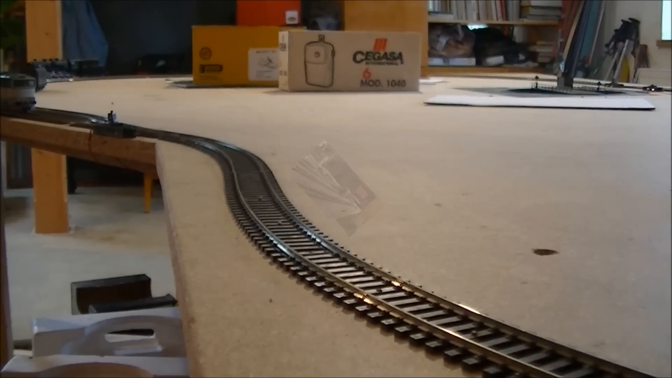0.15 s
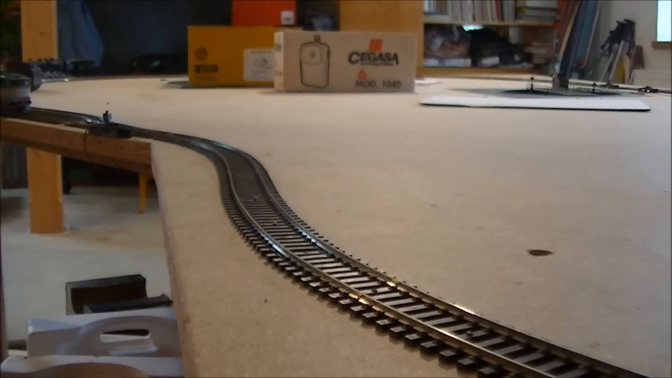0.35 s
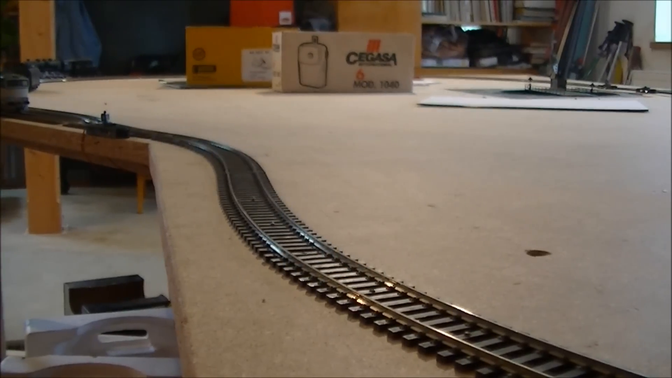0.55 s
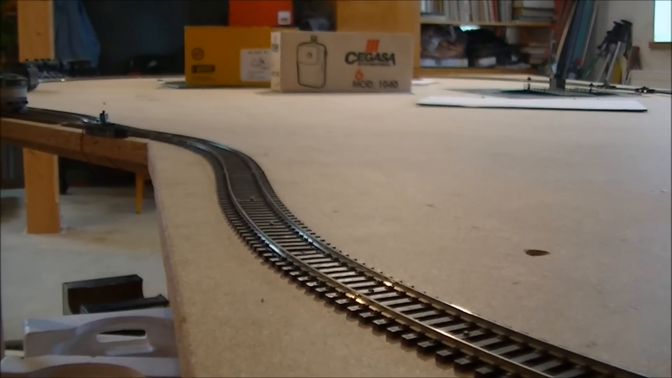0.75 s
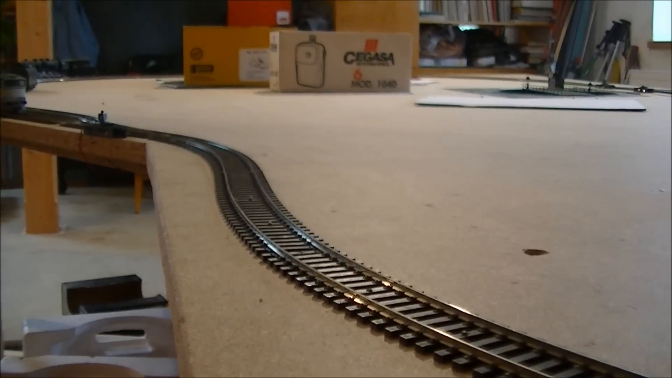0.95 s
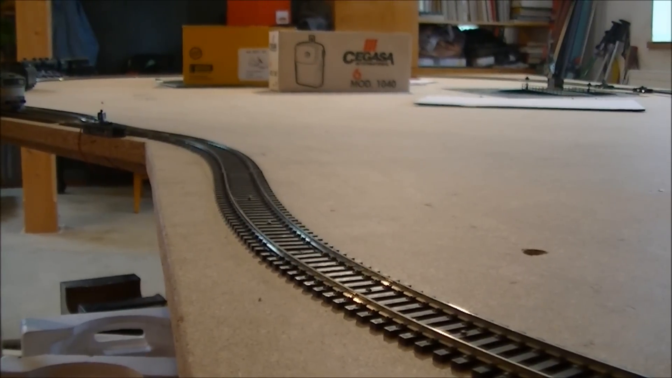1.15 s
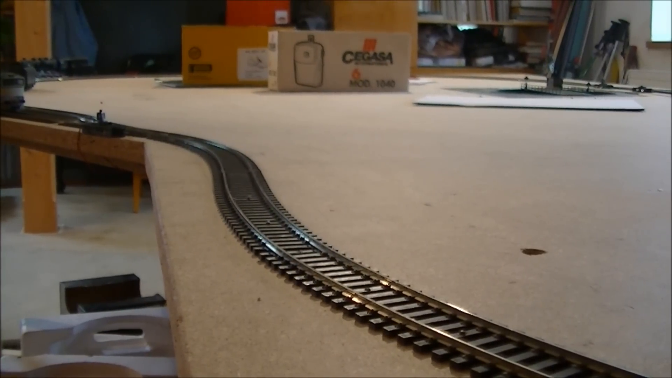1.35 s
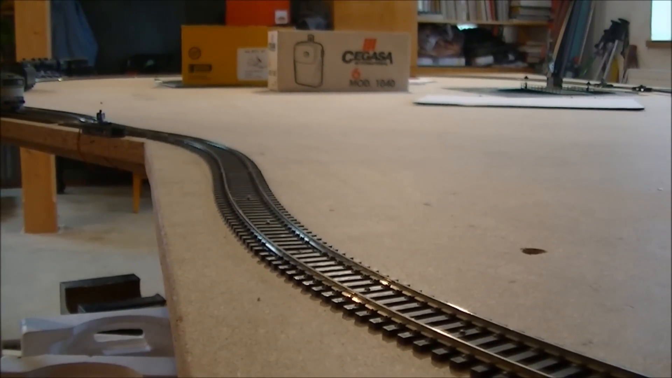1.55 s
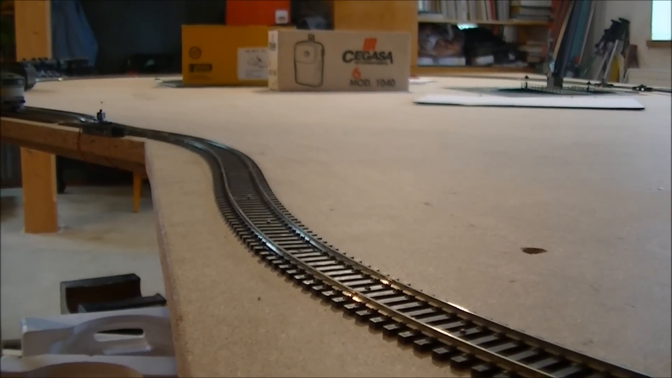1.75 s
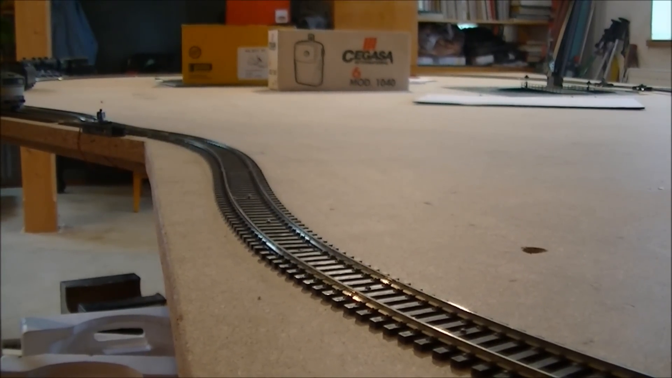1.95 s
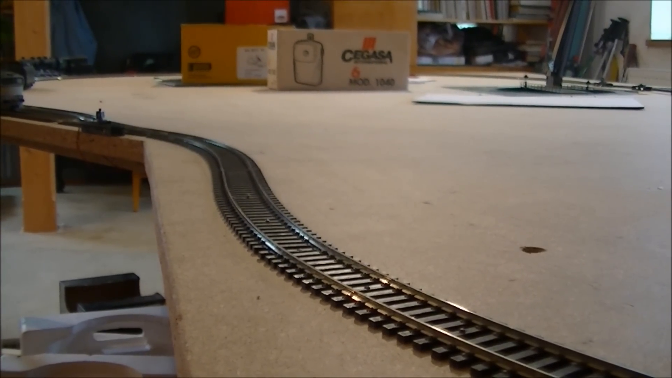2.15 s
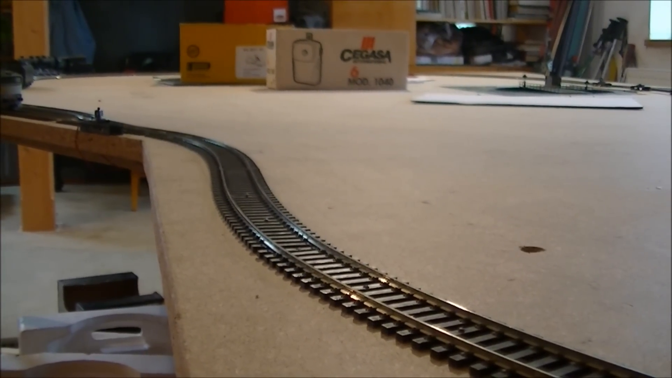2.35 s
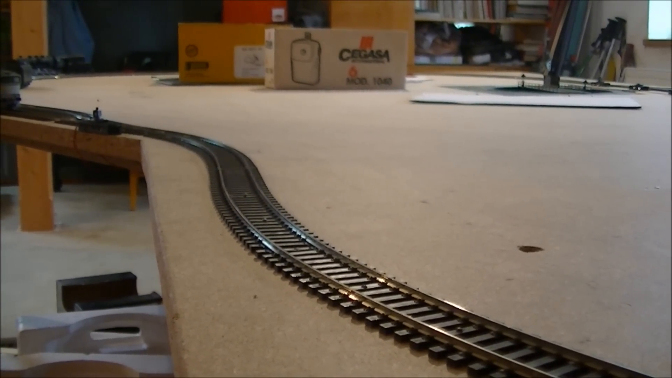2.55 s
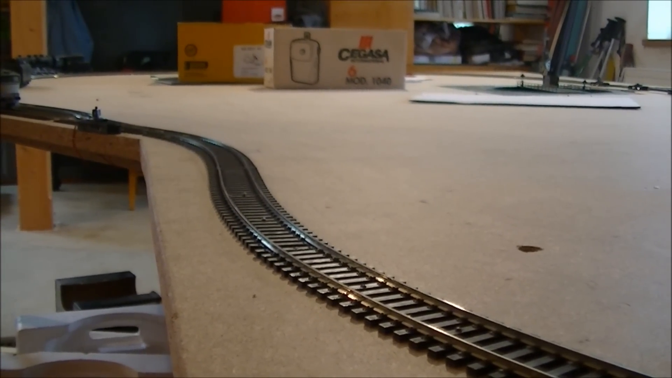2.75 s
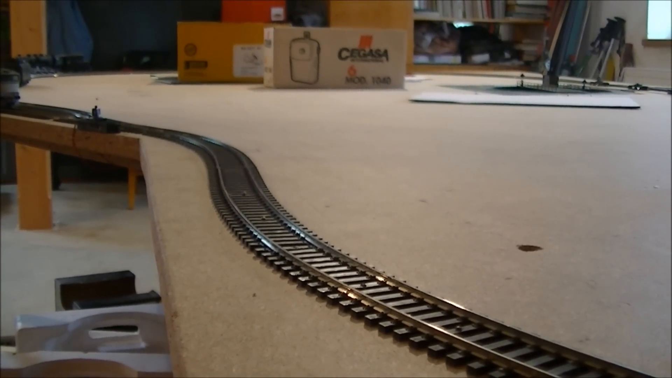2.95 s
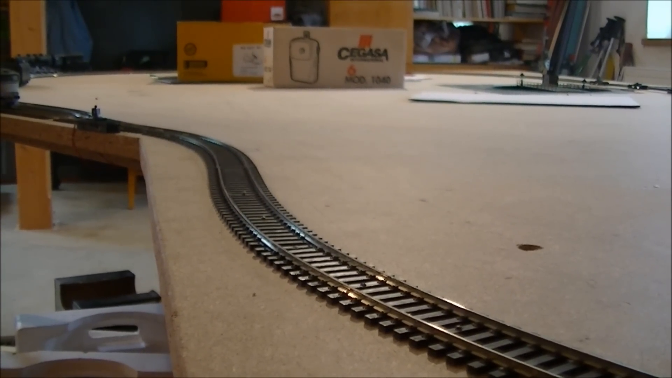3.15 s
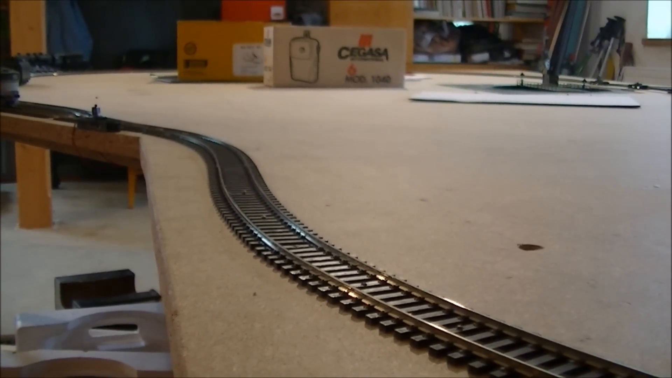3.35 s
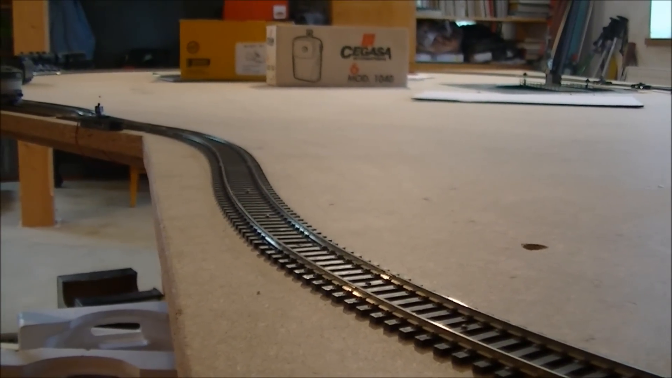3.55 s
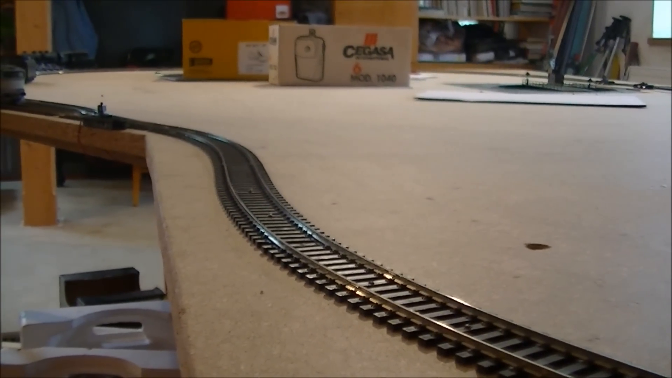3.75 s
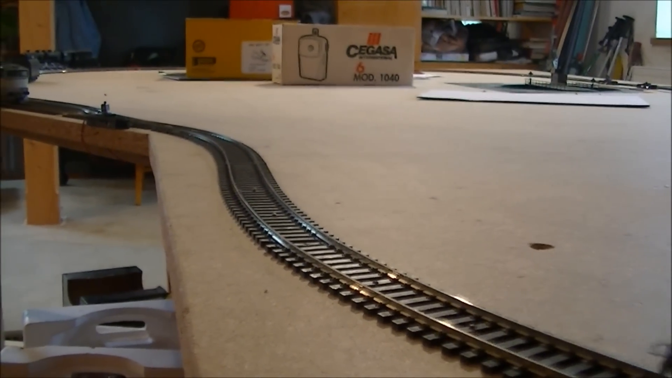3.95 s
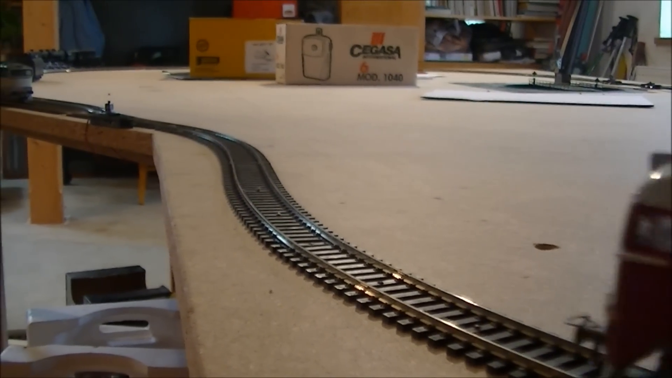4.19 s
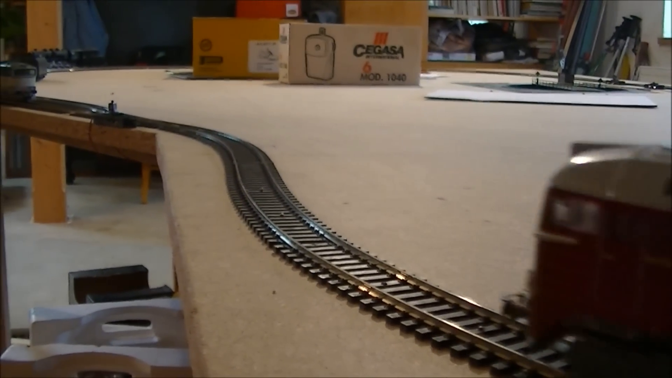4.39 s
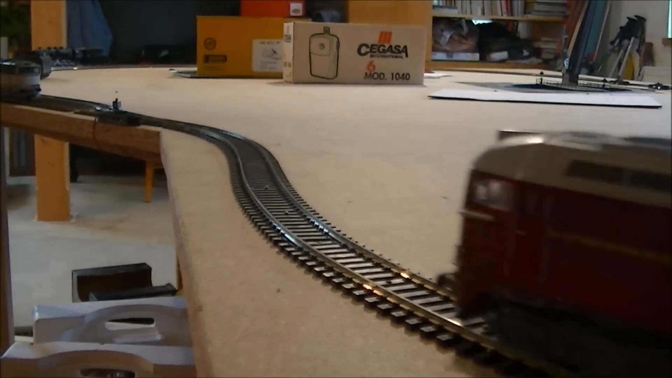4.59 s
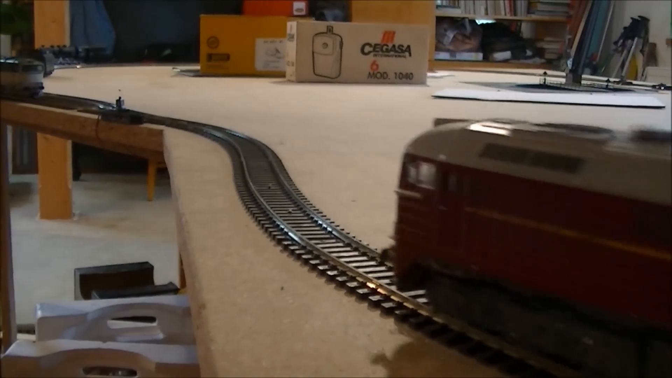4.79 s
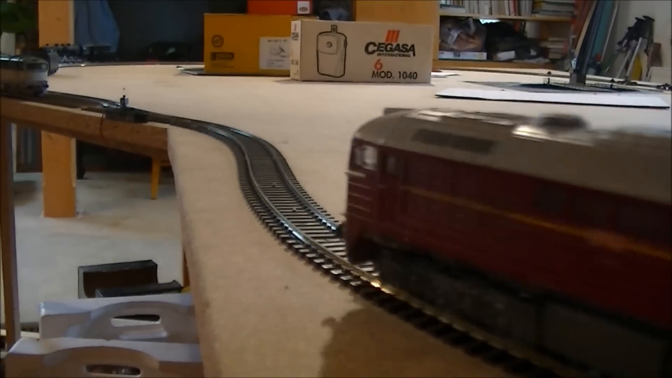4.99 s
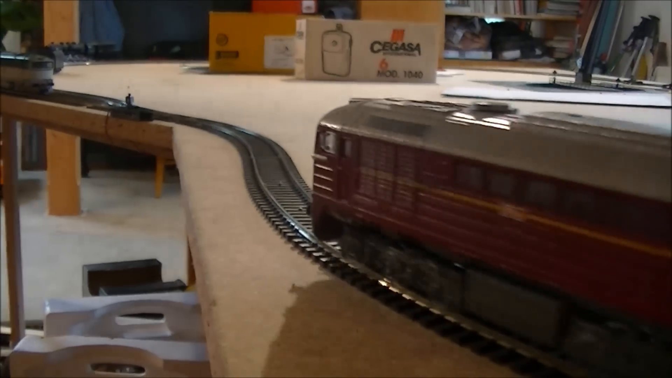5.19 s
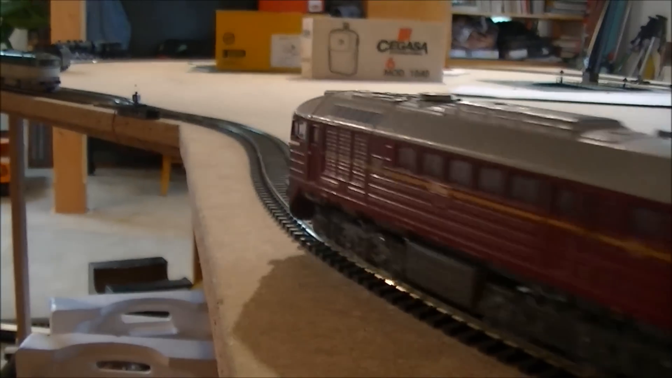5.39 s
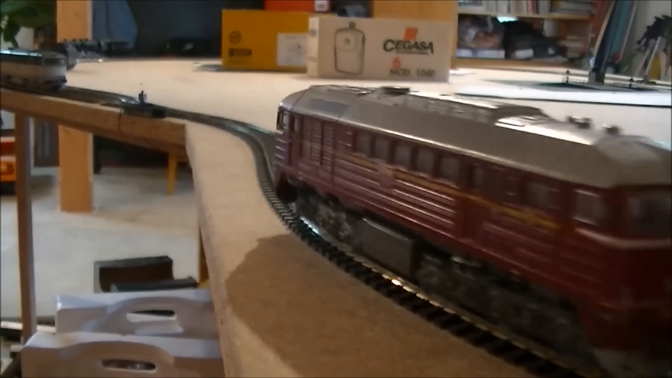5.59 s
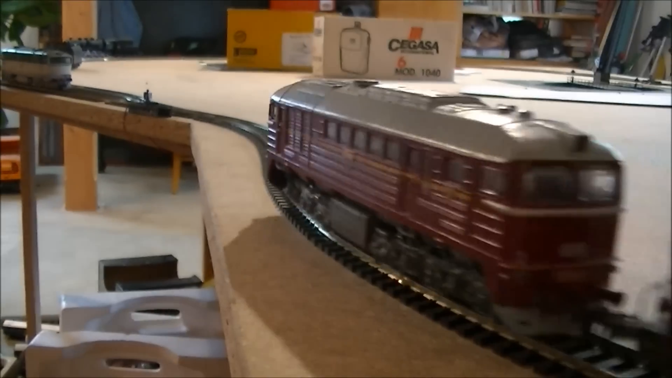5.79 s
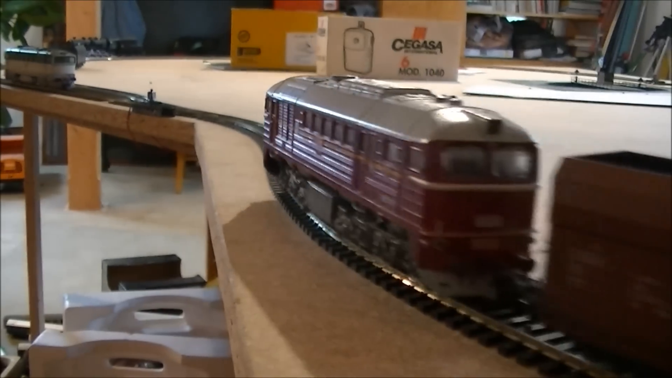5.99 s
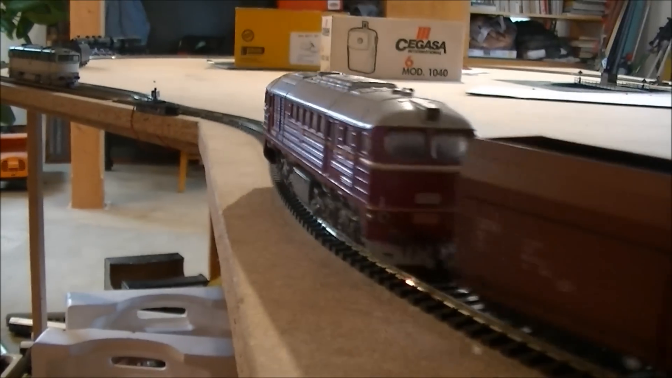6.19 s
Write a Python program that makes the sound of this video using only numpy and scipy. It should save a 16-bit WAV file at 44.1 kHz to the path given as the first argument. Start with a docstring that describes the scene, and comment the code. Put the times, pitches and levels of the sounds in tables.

```python
"""The gear train of a small electric model locomotive chatters as it passes close by on a chipboard layout.
Each contact of its 13-tooth pinion is an impact that excites the resonances of gearbox and shell; one
worn tooth knocks once a turn, and the motor sags where the current drops out. Metal wheels rush on the
rails, rail joints and a few harder gear knocks give sharp clicks and thuds, and a nick in one wheel
rings its rim. The board rumbles underneath, and a furnished room adds a short reverberation."""
import sys
import numpy as np
from scipy import signal
from scipy.fft import rfft, irfft, next_fast_len
from scipy.io import wavfile
from scipy.ndimage import uniform_filter1d

SR = 44100
rng = np.random.default_rng(int(sys.argv[2]) if len(sys.argv) > 2 else 0)


def transcribe(u):
    """Save the signal u as a 16-bit wav file named by the first command-line argument.

    u: samples, shape (n,) or (channels, n), limited to [-1, 1]; the rate is SR.
    q: integer samples, one column per channel.
    """
    v = np.clip(np.atleast_2d(u).T, -1, 1)
    q = np.round(v * 32767).astype(np.int16)
    wavfile.write(sys.argv[1], SR, q)


N = 274743
CLOCK = np.arange(0, N / SR + .004, .004)  # t/s for slowly varying gains

# reverberation time of the room: f/Hz, T60/s
ROOM_DECAY = [(300, 1), (2000, 0.36), (10000, 0.084)]
# relative spectrum of wheels rolling on rails: f/Hz, level/dB
RUSH_SPECTRUM = [(35, -64), (60, -59), (278, -23), (420, -15), (642, -6.5), (953, -8), (2100, -1.5),
                 (2800, -7), (3580, -4), (4520, -8), (5580, -6.5), (6300, -15.5), (7500, -13), (9300, -17),
                 (13800, -63), (15500, -67)]
# relative spectrum of the wagon wheels: f/Hz, level/dB
FIZZ_SPECTRUM = [(6180, -44), (10500, -14), (12500, -6), (13200, -9), (15800, -14.5)]
# sharp clicks and thuds from the running train (rail joints and a few harder gear knocks),
# in relative levels: t/s, click/dB, thud/dB, treble/dB
SHARP_IMPACTS = [(.388, -34, -34, -55), (1.5603, -45, -31, -45), (3.312, -36, -33, -44),
                 (3.5605, -24, -35, -42), (3.578, -43, -29, -46), (3.6755, -30, -25, -45),
                 (3.7985, -27, -27, -38), (3.8466, -24.5, -27.5, -51), (3.879, -30, -30, -32),
                 (3.911, -15.5, -28, -27), (4.447, -31, -29, -24), (4.663, -25, -36, -39),
                 (4.687, -26, -40, -31), (5.009, -31, -35, -18.5), (5.3768, -35, -30, -27),
                 (5.466, -39, -26, -23), (5.8114, -24.5, -24.5, -27), (5.898, -41, -31, -21),
                 (6.1116, -35, -31, -41)]
# resonances they excite, one list each for thud, click and treble: f/Hz, bandwidth/Hz, gain/dB
IMPACT_MODES = [(1380, 450, 10), (2184, 63, 15.5)], [(3300, 470, 15.5), (4500, 3200, -3)], [(8100, 2700, 3),
                (12500, 3000, -32.5)]
# audible blows of a nick in a driven wheel, in runs about three pinion turns apart: t/s, relative level/dB
NICK_BLOWS = [(0.8275, -32), (1.0236, -37), (1.0884, -31), (1.1588, -33), (2.726, -34), (2.7914, -26),
              (2.8574, -30), (2.924, -36), (2.9891, -33), (3.0976, -20), (3.1617, -27), (3.2246, -30),
              (3.2899, -26), (3.4379, -26.5), (3.5867, -32), (4.8424, -25), (4.917, -24), (4.9866, -25),
              (5.1054, -30), (5.239, -27), (5.3083, -28), (5.3762, -31), (5.443, -33), (5.5095, -31),
              (5.6181, -30), (5.684, -33)]
# pinion speed apart from drop-outs: t/s, speed/(turns/s)
PINION_SPEED = [(0, 46.19), (.14, 44.99), (.76, 50.47), (.88, 46.08), (1.35, 43.96), (1.56, 47.05),
                (1.86, 49.47), (2.26, 43.72), (2.5, 42.01), (2.64, 41.44), (2.8, 47.14), (2.85, 45.3),
                (3.29, 47.35), (3.5, 40.8), (3.96, 32), (3.99, 33.18), (4.24, 34.76), (4.56, 36.49),
                (4.8, 39.63), (5.09, 43.3), (5.66, 45.93), (6.08, 48.83), (6.3, 45.95)]
# breaks in the current: t/s, depth/dB, duration/s, rotation lost/turns
CURRENT_DROPOUTS = [(1.134, 3, .027, .129), (3.361, 4, .04, .668), (3.63, 2.5, .037, .902),
                    (3.853, 9.5, .026, .79), (3.9, 3.5, .03, .533), (4.191, 4, .02, .794)]
# relative strength of the teeth in order of meshing: hiss/dB, knock/dB, drone/dB
TOOTH_LEVELS = [(4.5, -3, 1.5), (3.5, 2.5, 0), (-1, -6, 5), (-15, -14.5, -4.5), (-3.5, -6, -8),
                (1, -9, -2.5), (-5, -12.5, -3), (1.5, -9.5, -2.5), (-1.5, -9.5, -11), (-4, -6.5, -5.5),
                (2, -10, 3.5), (-2, -7.5, -2.5), (-0.5, -5.5, -4)]
# play in the gears, which makes the teeth more unlike: t/s, factor on the tooth levels in dB
BACKLASH = [(0, 1.1), (1.1, 1), (1.18, 1.45), (1.5, 1.3), (1.8, .8), (2.15, 1.1), (2.4, 1.6), (2.55, 1.3),
            (3, 1), (3.1, 1.1), (3.55, 1.25), (4.5, 1.5), (4.62, 1), (4.7, 1.16), (5.05, 1.3), (5.25, 1.1),
            (6.23, 1)]
# low resonances of shell and gearbox, whose lobes and shadows sweep over the listener:
# f/Hz, bandwidth/Hz, gain/dB, [(lobe gain/dB, t/s, width/s)]
DRONE_MODES = [(833, 62, -9, [(16, 4.51, 0.24), (-6.5, 4.57, .3)]), (910, 140, -11, [(18, 3.7, 0.3)]),
               (1107, 230, -2.5, [(-19, 1.86, 0.25), (6.5, 5.43, 0.15)]),
               (1337, 270, -8.5, [(8, 3.14, 0.11), (9, 3.46, 0.14)]), (1506, 180, -5.5, [(17.5, 3.7, 0.45),
               (11.5, 4.78, 0.32), (11, 5.43, 0.16)]), (1757, 170, -4, [(10, 3.2, 0.2), (-20, 4.55, 0.32),
               (12, 5.7, .2)]), (2030, 350, -1, [(4, 3.8, .15), (4, 5.1, 0.29)]),
               (2260, 320, 0, [(5, 3.24, 0.11), (-27, 4.66, 0.23), (7.5, 5.22, 0.18)]),
               (2630, 440, -2.5, [(18, 6.12, 0.33)])]
# middle resonances: columns as above
KNOCK_MODES = [(3004, 145, -5.5, [(11, 1.9, 0.25), (7.5, 5.17, 0.38)]), (3394, 225, -1.5, [(5.9, 1.14, .15),
               (9.6, 2.16, 0.19), (3.7, 3.4, 0.23), (11.2, 5.17, 0.71)]),
               (3640, 200, -1.5, [(9.5, 1.2, 0.22), (5, 3.2, 0.18), (-3, 6.2, 0.12)]),
               (3870, 290, -3, [(8.3, 2.1, 0.29), (12.6, 4.92, 0.24), (6.6, 6.1, 0.16)]),
               (4100, 350, -0.5, [(12.7, 4.36, 0.097), (7, 4.69, 0.07), (5.4, 5.12, .2)]),
               (4440, 370, 0.5, [(6.6, 1.28, 0.11), (8, 2.21, 0.15), (5, 4.07, 0.11), (2.1, 4.9, 0.13)]),
               (4753, 230, 2, [(5, 3.12, 0.12), (5, 3.55, 0.081), (6, 4, 0.096), (6, 5.96, 0.3)]),
               (5144, 240, -2, [(6, 2.87, 0.22), (6, 5, 0.36)]), (5646, 256, -2, [(3.5, 1.3, 0.74),
               (-8, 4.1, 0.22), (5, 5.1, 0.33)]), (6025, 210, -5, [(6, 2.95, 0.23), (6, 6.3, 0.44)])]
# high resonances: columns as above
HISS_MODES = [(6700, 1340, 2, [(-5, 4.86, 0.57)]), (7375, 260, -1.5, [(9.8, 5.72, 0.29)]),
              (7810, 410, 4.5, [(-12, 0.74, 0.4), (4.5, 5.3, 0.22)]), (8270, 330, -3.5, [(-12, 1.4, 0.96),
              (10, 5.05, 0.26), (-8, 6.4, 0.27)]), (8550, 260, 2, [(7, 3.12, 0.12), (8, 3.5, 0.076),
              (-5, 4, 0.096), (15, 4.01, 0.1), (-8, 6.6, 0.3)]), (8940, 350, -6, [(8.4, 5.17, 0.44)]),
              (9400, 830, -2.5, [(10.3, 5.36, 0.2)]), (10480, 1460, -6.5, [(-6.5, 4.53, 0.98),
              (8.5, 5.48, 0.27)]), (10800, 400, -16, [(9, 4.95, .15)]),
              (11900, 1700, -21.5, [(10, 3.4, 1.6), (4.9, 6.1, .3)])]
# base level of the gearbox as it draws near and leaves: t/s, level/dB
GEARBOX_LEVEL = [(0, -43.5), (.7, -40), (1.1, -42), (1.3, -41), (1.65, -40.5), (2.1, -38.5), (2.45, -42),
                 (2.65, -40.5), (2.8, -38), (3.05, -36.5), (3.25, -35), (3.7, -37.5), (4.05, -39),
                 (4.35, -35.5), (4.55, -35.5), (4.7, -33), (4.87, -31.5), (5.1, -31), (5.45, -33),
                 (5.75, -37), (6.23, -42)]
# base level of the tone at the meshing frequency: t/s, level/dB
WHINE_LEVEL = [(0, -74), (2.2, -71), (2.33, -54), (2.45, -66), (2.7, -61), (2.78, -60), (3.2, -61),
               (3.3, -64.5), (4.4, -61), (5.6, -64), (5.85, -56), (6.23, -55)]
# response of the left channel over the right: f/Hz, level difference/dB
CHANNEL_BALANCE = [(500, -0.05), (2500, 0), (5000, 0.2), (12000, -0.5)]

ON_BOARD_S, ON_BOARD_OVER_S = 2.77, 0.71  # the train rolls onto the near board
ABREAST_S, ABREAST_OVER_S = 4.92, 0.49  # the open underside turns to the listener


def amp(db):
    return 10 ** (np.asarray(db) / 20)


def unit_rms(x):
    return x / np.sqrt(np.mean(x ** 2) + 1e-20)


def over_frequency(points, hz):
    """Interpolation of (f/Hz, value) points on a logarithmic axis."""
    f, values = np.transpose(points)
    return np.interp(np.log(hz + 1), np.log(f + 1), values)


def over_time(times, values):
    """Linear interpolation to one value per sample."""
    return np.interp(np.arange(N) / SR, times, values)


def past(s, over_s):
    """A smooth transition from 0 to 1, centred on time s."""
    return over_time(CLOCK, (1 + np.tanh((CLOCK - s) / over_s)) / 2)


def filtered(x, response):
    """Linear filtering: the spectrum is multiplied by a frequency response."""
    size = next_fast_len(N + SR // 2)
    return irfft(rfft(x, size) * response(np.fft.rfftfreq(size, 1 / SR)), size)[..., :N]


def resonators(modes):
    """Modal superposition: damped second-order resonances add with alternating sign."""
    return lambda f: sum((-1) ** k * amp(db) * 1j * f * width / (f0 * f0 - f * f + 1j * f * width)
                         for k, (f0, width, db) in enumerate(modes))


def levelled(x):
    """Division by the running RMS removes slow changes of level."""
    return x / np.sqrt(np.abs(uniform_filter1d(x ** 2, size=SR // 4)) + 1e-20)


def flickering(x, depth_db, frames=24):
    """Random gain over patches of frequency and time (3 ms a frame) makes the timbre flicker."""
    spectra = signal.stft(x, nperseg=256)[2]
    patches = uniform_filter1d(rng.standard_normal(spectra.shape[-2:]), size=3, axis=0)
    patches = uniform_filter1d(patches, size=frames, axis=1)
    return signal.istft(spectra * amp(depth_db * unit_rms(patches)), nperseg=256)[1][..., :N]


def impacts(times, level_db, decay_s, blow):
    """Impact excitation: each impulse, weighted by blow, lies within a short puff of noise."""
    impulses = np.bincount(np.clip(times * SR, 0, N - 1).astype(int), amp(level_db), N)
    t = np.arange(-220, 221) / SR
    envelope = signal.oaconvolve(impulses, np.exp(-np.abs(t) / decay_s), "same")
    return blow * impulses + envelope * rng.standard_normal(N)


def board_rumble():
    """Forced vibration of the board: low noise with one humming resonance swells under the train."""
    shared, left, right = rng.standard_normal((3, N))
    noise = np.array([2.4 * shared + left, 2.45 * shared + right])
    hum = resonators([(134, 38, 5.0)])
    low = filtered(noise, lambda hz: amp(-68.5) * (1 / (1 + (hz / 250) ** 2) + hum(hz)) * hz / (hz + 60))
    return amp(2 * past(ON_BOARD_S, ON_BOARD_OVER_S)) * low


def reverberation(x, correlation):
    """Convolution with decaying noise; the room's impulse response is redrawn as the train moves."""
    step, wet = SR // 4, np.zeros((2, N + SR))
    for start in range(-step, N, step):
        hz, t, spectra = signal.stft(rng.standard_normal((2, SR // 4)), SR, nperseg=256)
        decay = amp(-60 * t / over_frequency(ROOM_DECAY, hz)[:, None])
        tail = signal.istft(spectra * decay, SR, nperseg=256)[1]
        piece = x[max(start, 0):start + 2 * step]
        piece = piece * np.sqrt(np.hanning(2 * step))[max(-start, 0):][:len(piece)]
        echoes = signal.fftconvolve(piece[None], tail / np.linalg.norm(tail[0]), axes=1)
        wet[:, max(start, 0) + 130:][:, :echoes.shape[1]] += echoes  # 3 ms late
    angle = np.arccos(correlation) / 2
    mid, side = wet[0, :N] * np.cos(angle), wet[1, :N] * np.sin(angle)
    return np.array([mid + side, mid - side])


def dropout_db():
    """The drive, and with it the level, falls while the pick-ups lose contact with the rail."""
    dips = sum(db * np.exp(-.5 * ((CLOCK - s) / (length / 2)) ** 4) for s, db, length, _ in CURRENT_DROPOUTS)
    return over_time(CLOCK, -dips)


def wheel_rush():
    """Rolling contact radiates broadband noise, spread over the board, which dips with the drive."""
    noise = flickering(rng.standard_normal((2, N)), depth_db=1.5)
    mid, side = filtered(noise, lambda hz: amp(over_frequency(RUSH_SPECTRUM, hz)))
    stereo = np.array([mid + amp(-24) * side, mid - amp(-14) * side]) * amp([[-0.8], [0.8]])
    level_db = -40.5 + 4.5 * past(ON_BOARD_S, ON_BOARD_OVER_S) + 1.06 * dropout_db()
    return amp(level_db) * unit_rms(stereo)


def wagon_fizz():
    """Shot noise: tiny random impacts of the wheels merge into a fizz that grows as the wagons come up."""
    when, strength = rng.random((14000, 2)).T
    grains = impacts(when * N / SR, -1.6 * np.log(1 - strength), decay_s=.0003, blow=1.2)
    fizz = filtered(grains, lambda hz: amp(over_frequency(FIZZ_SPECTRUM, hz)))
    return amp(-62 + 17.5 * past(4.9, over_s=0.48)) * unit_rms(fizz)


def clicks_and_thuds():
    """Rail joints and a few harder gear knocks excite damped modes: a thud, a click, a spit of treble."""
    s, click_db, thud_db, treble_db = np.transpose(SHARP_IMPACTS)
    thud_modes, click_modes, treble_modes = map(resonators, IMPACT_MODES)
    thud = filtered(impacts(s + 0.00089, thud_db, decay_s=0.00056, blow=8.8), thud_modes)
    click = filtered(impacts(s + 0.0011, click_db, decay_s=0.0005, blow=3.0), click_modes)
    treble = filtered(impacts(s + 0.00053, treble_db, decay_s=0.0011, blow=2.4), treble_modes)
    return filtered(thud + click + treble, lambda hz: hz ** 2 / (hz ** 2 + 500 ** 2))  # high-pass


def rim_pings(rim_hz=5290, bandwidth_hz=600):
    """Free vibration: the wheel's rim rings briefly after each blow of the nick."""
    s, db = np.transpose(NICK_BLOWS)
    blows = impacts(s, db + 14.5, decay_s=0.00015, blow=6.4)
    rim = resonators([(rim_hz, bandwidth_hz, 0)])
    return filtered(blows, lambda hz: rim(hz) ** 2)


def pinion_turns(first_turn=-.45):
    """Rotation is the integral of speed, less the turns lost at each drop-out."""
    turns_lost = sum(lost * past(s, over_s=.037) for s, *_, lost in CURRENT_DROPOUTS)
    return first_turn + np.cumsum(over_time(*zip(*PINION_SPEED))) / SR - turns_lost


def gear_whine():
    """A faint, wavering tone at the meshing frequency: the number of teeth times the rate of rotation."""
    waver = unit_rms(filtered(rng.standard_normal(N), lambda hz: 1 / (1 + (hz / 22) ** 2)))
    tone = np.sin(2 * np.pi * len(TOOTH_LEVELS) * pinion_turns())
    return (1 + 0.5 * waver) * tone * amp(over_time(*zip(*WHINE_LEVEL)) + dropout_db())


def directivity_db(lobes):
    """Directional radiation: a mode's level rises and falls as its lobes and shadows pass."""
    return sum(db * np.exp(-.5 * ((CLOCK - s) / width) ** 2) for db, s, width in lobes)


def tooth_impacts(errors, modes, column, lag_turns, jitter_turns, scatter_db, decay_s, blow):
    """Each tooth contact is an impact that rings gearbox and shell; backlash makes the blows more unequal."""
    turns, teeth = pinion_turns(), len(TOOTH_LEVELS)
    contact = np.arange(int(turns[-1] * teeth))
    timing_error, force_error = errors[:len(contact)].T
    times = np.interp(contact / teeth + lag_turns + jitter_turns * timing_error, turns, np.arange(N) / SR)
    backlash = np.interp(times, *zip(*BACKLASH))
    level_db = backlash * np.array(TOOTH_LEVELS)[contact % teeth, column] + scatter_db * force_error
    force = impacts(times, level_db, decay_s, blow)
    # gearbox, then shell: each resonance acts twice
    rings = filtered(force, lambda hz: [resonators([(f0, width, 0)])(hz) ** 2 for f0, width, *_ in modes])
    return sum((-1) ** k * over_time(CLOCK, amp(db + directivity_db(lobes))) * rings[k]
               for k, (*_, db, lobes) in enumerate(modes))


def gear_chatter():
    """The same tooth contacts drive three groups of modes, heard as hiss, knock and drone."""
    errors = rng.standard_normal((4000, 2))  # each contact is early or late, hard or soft
    hiss = tooth_impacts(errors, HISS_MODES, column=0, lag_turns=-.16, jitter_turns=.004,
                         scatter_db=1.5, decay_s=.00015, blow=3.4)
    knock = tooth_impacts(errors, KNOCK_MODES, column=1, lag_turns=-.19, jitter_turns=.004,
                          scatter_db=0.5, decay_s=.00014, blow=11)
    drone = tooth_impacts(errors, DRONE_MODES, column=2, lag_turns=-.225, jitter_turns=.0074,
                          scatter_db=2.0, decay_s=.0011, blow=4.4)
    hiss = levelled(flickering(hiss, depth_db=2.0))
    drone = levelled(flickering(drone, depth_db=0.5))
    knock = levelled(flickering(knock, depth_db=1.8, frames=7))  # each turn favours other resonances
    abreast = past(ABREAST_S, ABREAST_OVER_S)
    covered = 1 - past(0.76, over_s=0.31)  # the knock comes out of cover
    gears = amp(-8.5 + 11.5 * abreast) * hiss + amp(-10 * covered) * knock + amp(-5 - 1.5 * abreast) * drone
    return amp(over_time(*zip(*GEARBOX_LEVEL)) + dropout_db()) * gears


def scene():
    """Superposition: the engine and its reverberation drift from the right to the middle, over rolling noise."""
    direct = gear_chatter() + gear_whine() + clicks_and_thuds() + rim_pings()
    engine = direct + amp(-11.5) * reverberation(direct, correlation=0.94)
    pan_db = -2 + 2.5 * past(5.37, ABREAST_OVER_S)  # left minus right
    return engine * amp([pan_db / 2, -pan_db / 2]) + wheel_rush() + wagon_fizz() + board_rumble()


def record(dry, corner_hz=11500, limit_hz=15900):
    """Low-pass response of two small, slightly unequal ports, with nothing above the band limit."""
    def response(hz):
        balance = amp(over_frequency(CHANNEL_BALANCE, hz) * np.array([[.5], [-.5]]))
        return balance / np.sqrt(1 + (hz / corner_hz) ** 8) * (hz < limit_hz)
    return filtered(dry, response)


dry = scene()
out = record(dry)
transcribe(out)
```